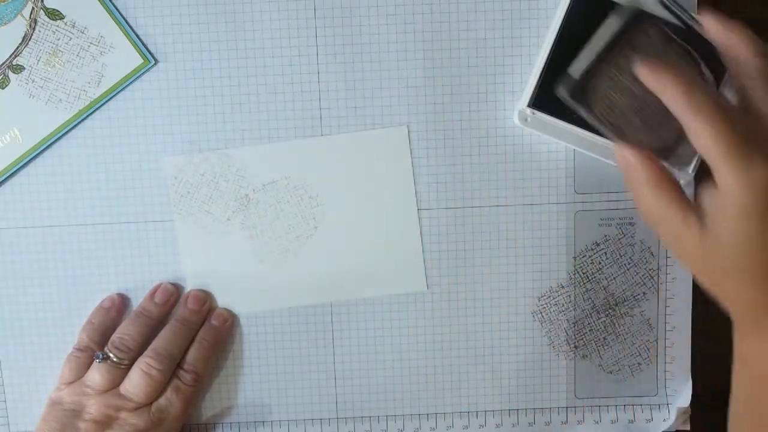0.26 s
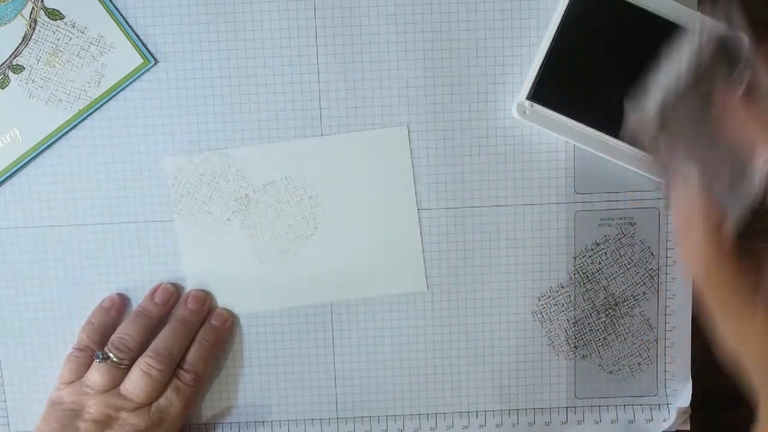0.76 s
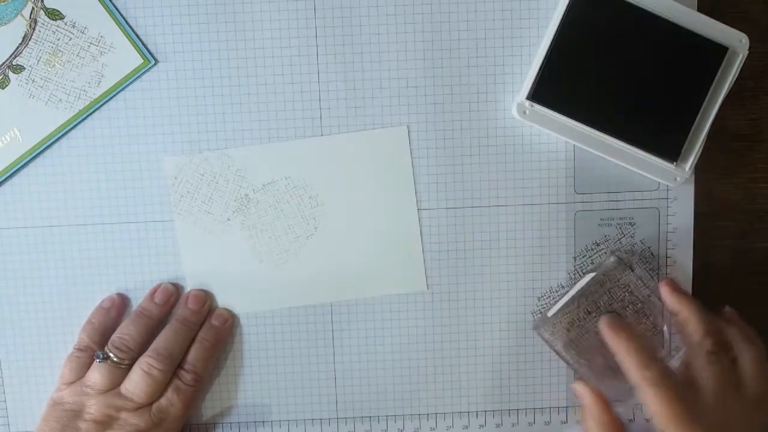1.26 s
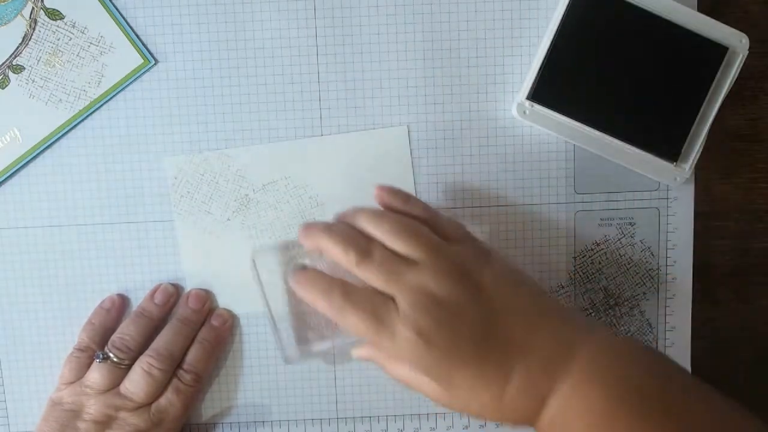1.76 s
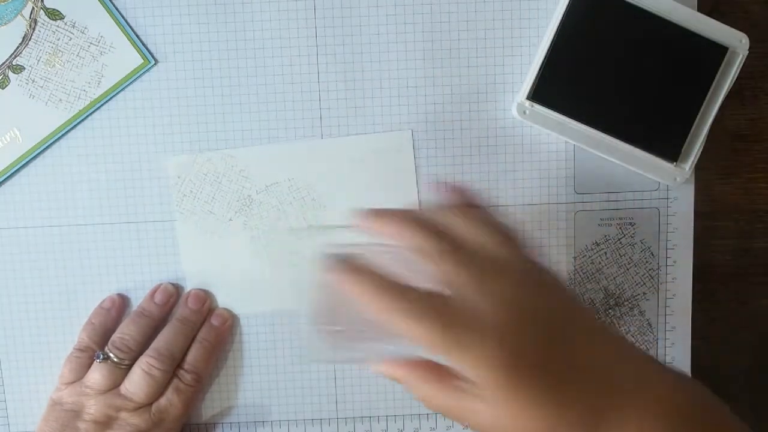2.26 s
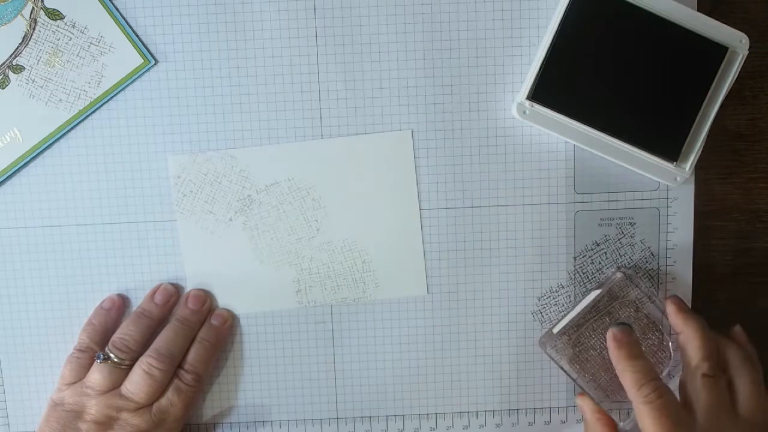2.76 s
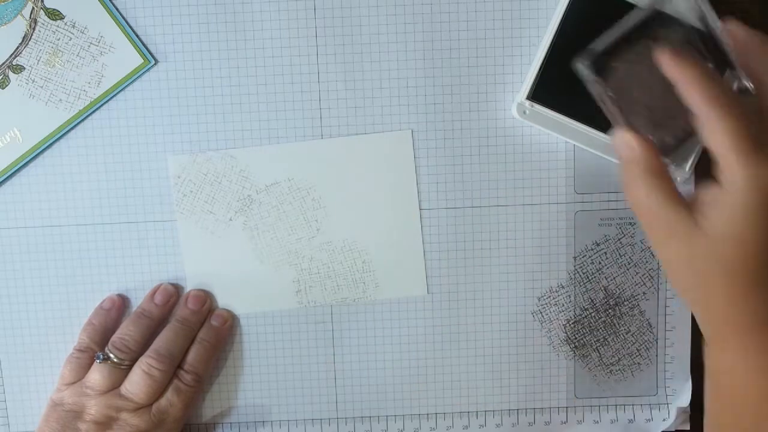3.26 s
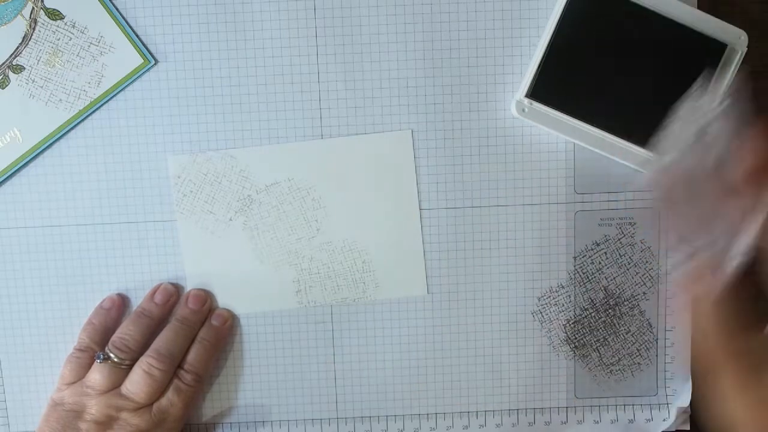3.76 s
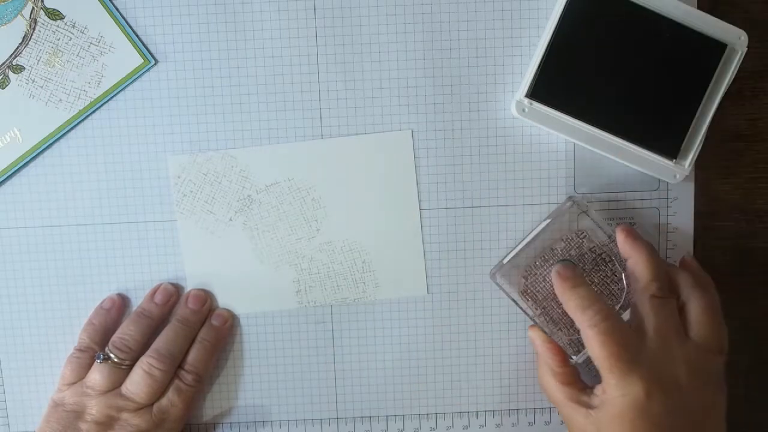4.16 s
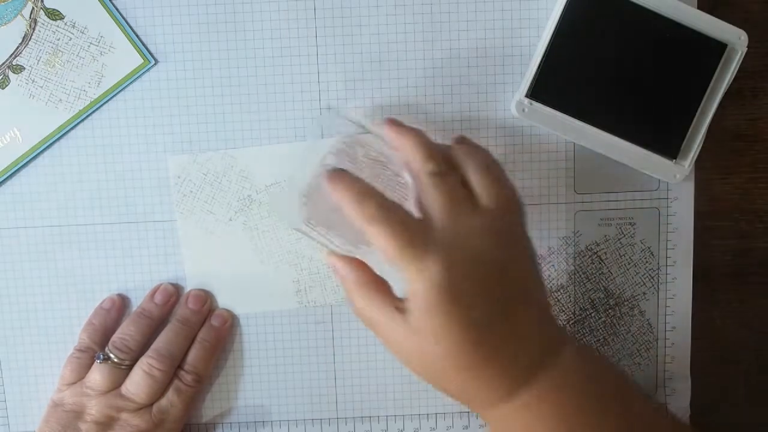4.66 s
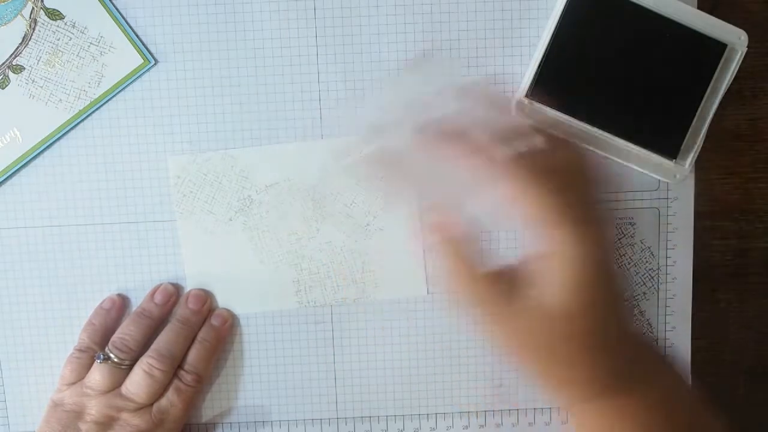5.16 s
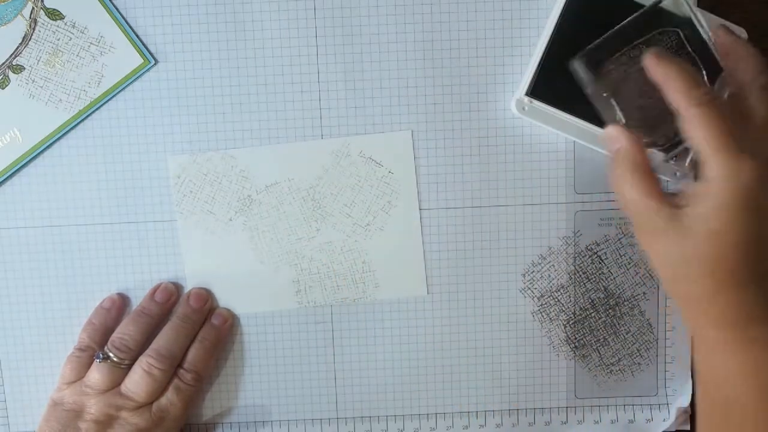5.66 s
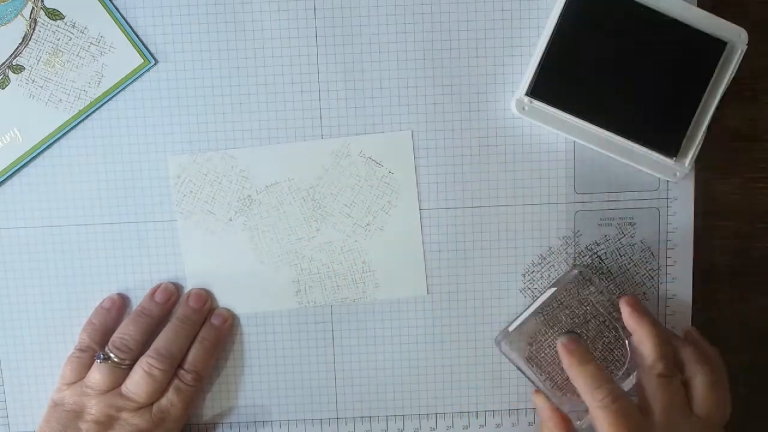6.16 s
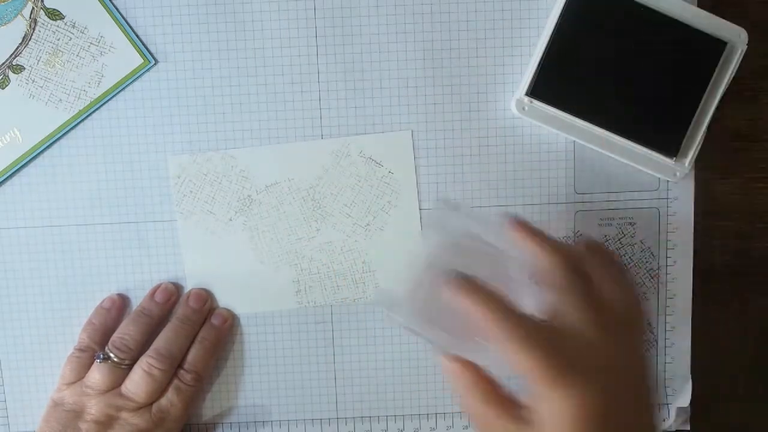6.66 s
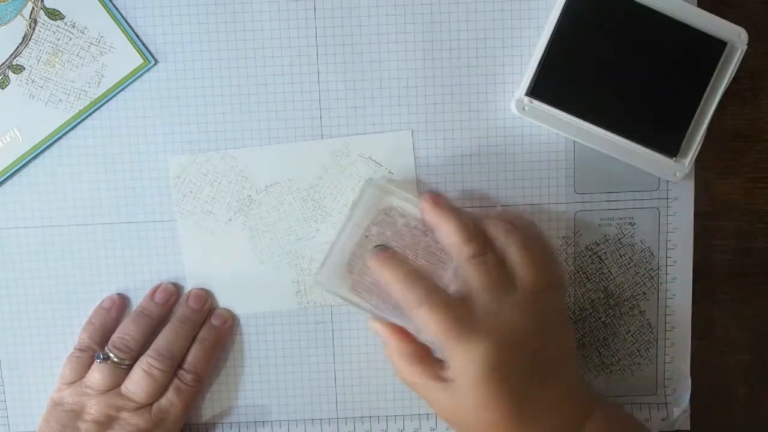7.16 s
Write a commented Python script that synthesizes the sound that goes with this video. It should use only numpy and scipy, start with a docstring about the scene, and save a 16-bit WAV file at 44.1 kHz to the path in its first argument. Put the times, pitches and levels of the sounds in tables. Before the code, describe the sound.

Over a soft, low room hush, a plastic stamp block is inked and pressed again and again. Dull pad bumps with slight hollow case rattle alternate with firm woody thumps topped by dry plastic clacks. Brief crackly peels release the tacky rubber. A hand lightly brushes paper, something loose rocks dully, and a short near-wall slap follows the close knocks.

```python
"""First the hush of a small room, then a bump on an ink pad, close to a pair of microphones at a craft table.
A clear acrylic stamp block lands on the pad, on scrap paper and on a card: damped modes thump the table top,
struck resonances clack the block or the pad's plastic case, and the tacky stamp peels off as a burst of snaps.
Something loose rocks with a dull double clack and a hand brushes the paper as swelling, grainy noise.
A slap from the near wall and a short diffuse echo place it all in the room."""
import sys
import numpy as np
from scipy import signal
from scipy.fft import rfft, irfft, next_fast_len
from scipy.io import wavfile

SR = 44100
rng = np.random.default_rng(int(sys.argv[2]) if len(sys.argv) > 2 else 0)


def persist_wave(psi):
    """Save psi, clipped to +-1, as 16-bit WAV."""
    counts = np.round(np.clip(psi, -1, 1) * 32767).astype(np.int16)
    wavfile.write(sys.argv[1], SR, np.atleast_2d(counts).T)


N = 327222
HIT_SIZE = SR // 2  # samples in half a second, the longest ring or echo

# Levels are relative within each table unless a reference is given.
# room hush, spectral density: pitch_hz, level_db (per Hz)
HUSH_COLOUR = [(15, -37), (25, -8), (53, 5.5), (70, -1.5), (152, 0), (316, -9.5), (403, -9), (637, -11),
               (749, -5.5), (812, -9.5), (1040, -9.5), (1150, -18), (1870, -11.5), (4950, -21.5),
               (15800, -29)]
# decay of the room's echo: pitch_hz, t60_s, level_db
ROOM_ECHO = [(149, 0.23, -11), (434, 0.17, -11), (925, 0.19, -9), (1800, 0.17, -11.5), (3500, 0.16, -11.5),
             (6640, 0.065, -13.5), (8500, 0.21, -6), (11300, .17, -13), (15100, 0.04, -11)]
# diffuse sound at the two microphones: pitch_hz, likeness (correlation, 0 to 1)
MIC_LIKENESS = [(100, 0.8), (500, 0.31), (1500, 0.23), (4000, 0.023), (8000, 0), (15000, 0.27)]
# hand and sleeve brush over the paper: middle_s, level_db (rms at full swell), half_length_s (to 1/e)
BRUSH_STROKES = [(1.604, -63.5, 0.16), (1.79, -57.5, 0.059), (4.53, -64.5, 0.08)]
# brush spectral density: pitch_hz, level_db (per Hz)
BRUSH_COLOUR = [(100, -25), (1500, -9), (4000, -2.5), (6800, -18), (8800, -4), (11000, -17), (16000, -9)]
# something loose rocks as the pressure changes: main_clack_s, level_db
LOOSE_ROCKS = [(1.23, -28.5), (1.82, -48), (6.365, -22)]
# resonances of the loose thing: pitch_hz, width_hz, level_db
LOOSE_RESONANCES = [(603, 310, -2), (750, 146, 3.5), (920, 164, 0.5), (1614, 96, 6.5), (1980, 117, 2),
                    (2550, 270, -6), (3450, 550, -9.5)]
# table top modes, its slow sway first: pitch_hz, level_db, t60_s (before the hand's damping)
TABLE_MODES = [(50, -15, 0.3), (88, -13, 0.292), (102, -5, 0.114), (119, -7, 0.193), (145, -19, 0.296),
               (161, 0, 0.066), (194, -9, 0.17), (232, -11.5, 0.16), (300, -14.5, 0.12), (343, -12, 0.223),
               (330, 1, 0.024), (421, -21, 0.118), (487, -9, 0.105), (572, -21, 0.164), (709, -17, 0.109),
               (866, -19, 0.122)]
# block lands on the ink pad, or the lifted pad drops back: start_s, thump_db, contact_hz (bandwidth), sway_db,
# knock_lag_s (negative = before the thump), knock_db, tick_db, touch_db (first touch, lighter or louder)
PAD_BUMPS = [(0.2139, -13.5, 128, 2, 0.0236, -25.5, -38, -41),
             (0.5202, -25.5, 91, 6.5, -0.013, -43.5, -53, -55),
             (3.2046, -12.5, 120, 3.5, 0.0092, -34.5, -49, -44.5),
             (5.3212, -10, 115, 3, 0.0215, -44, -47.5, -37)]
# resonances of the pad's plastic case: pitch_hz, width_hz, level_db
CASE_RESONANCES = [(400, 69, -2.5), (655, 66, -1.5), (835, 76, 3.5), (1143, 61, -2), (1554, 155, 2),
                   (1720, 274, 1.5), (1910, 610, -4), (2565, 200, -4.5), (3650, 520, -9)]
# stamp peels off: snap_s, level_db, fade_s (die-away scale), treble_db (lift of the treble)
PEELS = [(0.492, -47, 0.0032, 16), (0.504, -45.5, 0.0037, 5), (1.16, -38, .005, -11),
         (2.069, -37, 0.003, -1.5), (2.756, -34.5, 0.014, 4.5), (3.418, -40.5, 0.03, 5.5),
         (4.110, -36.5, 0.012, -2.5), (4.950, -30, 0.0043, 2), (5.547, -44.5, 0.022, 17),
         (6.305, -33, 0.0086, 0), (7.069, -33.5, 0.01, 10.5)]
# peel spectral density before the treble lift: pitch_hz, level_db (per Hz)
PEEL_COLOUR = [(200, -9), (700, -5), (1100, -5.5), (1550, 1), (1850, -1), (2600, 4.5), (4800, 0.5),
               (7000, -6.5), (8800, -1.5), (11000, -6.5), (13500, -12.5), (16000, -15)]
# block lands on paper: first_touch_s, thump_db, contact_hz (bandwidth), sway_db (of the whole table),
# clack_db, body_db (hollow body), tip_s (from a corner onto the edge; 0 = lands square)
STAMPINGS = [(0.9208, -13, 280, 0.5, -27, -28, 0.006), (1.7315, -12.5, 95, -2, -34, -36, 0.007),
             (2.4891, -17, 900, 5, -20, -17, 0), (3.8627, -15.5, 520.5, 2.5, -28, -22.5, 0.00051),
             (4.6439, -13.5, 230, 5.5, -28, -24, 0.0023), (6.017, -20, 155, -11, -45.5, -39, 0.0103),
             (6.736, -10, 205, -1, -23.5, -23.5, 0.00044), (7.3914, -12.5, 228, 0, -27.5, -21, 0.0016)]
# resonances of the block's hollow body: pitch_hz, width_hz, level_db
BODY_RESONANCES = [(520, 92, 1.5), (690, 250, -3.5), (895, 225, -2)]
# resonances of the block's clack: pitch_hz, width_hz, level_db
CLACK_RESONANCES = [(1200, 360, -13), (1663, 260, 13), (1956, 210, 12), (2580, 1030, 9), (3700, 250, -41),
                    (3800, 1000, -10), (5450, 2100, -10)]
# resonances of the bright tick of hard contacts: pitch_hz, width_hz, level_db
TICK_RESONANCES = [(5600, 170, 15), (8550, 5100, 9.3), (11460, 4500, 3.1)]

HUSH_DB = -56.64  # rms against full scale
CUTOFF_HZ = 15900  # top of the recorded band
ROCK_LEAD_S, ROCK_LEAD_DB = 0.009, -7  # the lighter first clack of each pair
WEIGHT_LAG_S = 0.00244  # the weight bears on the table just after the first touch
SECOND_S, SECOND_DB = 0.006987, 0.9  # each low thump comes twice: delay and strength of the second thump
HAND_DAMPING = 1.16  # the pressing hand speeds up the table's decay by this factor
SQUEEZE_CYCLES = 0.23  # the rubber takes up the load over this share of a period of the contact bandwidth
JOLT_DB, JOLT_HZ = -7, 176  # table jolt from a sudden peel: level against the peel, contact bandwidth
SUDDEN_S = 0.004  # die-away at which the jolt has that level; slower peels jolt less
TOUCH_LEAD_S, TOUCH_TICK_DB = 0.011, -15  # first touch: lead on the knock, its tick against its own level
RATTLE_GAP_S = 0.022  # mean spacing as the case settles
RATTLE_DB, RATTLE_LOSS_DB = -37.5, 4.5  # first bounce against the thump, loss per bounce
BUILD_S, BUILD_SHARE = 0.0098, 0.76  # least build-up of the pull; in a slow peel, share of its die-away
CORNER_DB = -16.5  # a corner's touch against the clack that follows


def from_db(db):
    """Decibels to gain."""
    return 10 ** (np.asarray(db) / 20)


def unit(x):
    """Scale to energy 1."""
    return x / np.sqrt(np.sum(x ** 2) + 1e-20)


def at_hz(points, hz, axis=1):
    """Read one column of a table on a log-frequency axis."""
    points = np.array(points)
    return np.interp(np.log(np.maximum(hz, 1)), np.log(points[:, 0]), points[:, axis])


def cut(x, hz, kind, order=2):
    """Butterworth low- or high-pass."""
    return signal.sosfilt(signal.butter(order, min(hz, SR / 2 - 10), kind, fs=SR, output="sos"), x)


def colour(x, spectrum):
    """Give a noise a spectrum."""
    size = x.shape[-1]
    return irfft(rfft(x) * from_db(at_hz(spectrum, np.fft.rfftfreq(size, 1 / SR))), size)


def add(track, s, sound):
    """Mix a sound into a track at a time."""
    start = max(int(s * SR), 0)
    track[start:start + len(sound)] += sound[:max(N - start, 0)]


def delay(x, s):
    """Delay by any fraction of a sample."""
    size = next_fast_len(N + HIT_SIZE)
    turn = np.exp(-2j * np.pi * s * np.fft.rfftfreq(size, 1 / SR))
    return irfft(rfft(x, size) * turn, size)[:N]


def diffuse_noise(size):
    """White stereo noise, most alike at the two microphones in the bass."""
    mid, side = rfft(rng.standard_normal((2, size)))
    alike = np.clip(at_hz(MIC_LIKENESS, np.fft.rfftfreq(size, 1 / SR)), 0, 1)
    return irfft(np.sqrt(1 + alike) * mid + np.sqrt(1 - alike) * side * [[1], [-1]], size)


def strike(resonances, chatter_s, chatter):
    """A click and a brief chatter of small contacts ring the resonances, differently on each blow; energy 1."""
    t = np.arange(HIT_SIZE // 4) / SR
    fade = np.exp(-t / chatter_s)
    force = chatter * unit(rng.standard_normal(len(t)) * fade)
    force[0] += 1
    # sharp contacts feed all pitches evenly
    spread = rfft(force)
    force = irfft(spread / (np.abs(spread) + 1e-9), len(t)) * np.sqrt(fade)
    out = 0
    for k, (hz, width, db) in enumerate(resonances):
        r = np.exp(-np.pi * width / SR)
        gain = (-1) ** k * (1 - r * r) * from_db(db + rng.standard_normal())
        poles = [1, -2 * r * np.cos(2 * np.pi * hz / SR), r * r]
        out = out + gain * signal.lfilter([1, 0, -1], poles, force + 1e-18)
    return unit(out)


def room_hush():
    """Steady diffuse noise, strongest in the bass, lies under everything."""
    return from_db(HUSH_DB) * np.sqrt(2 * N) * unit(colour(diffuse_noise(N), HUSH_COLOUR))


def room_echo(x):
    """Diffuse echoes build up and die away, octave by octave."""
    t, echo = np.arange(HIT_SIZE) / SR, 0
    bins = np.fft.rfftfreq(HIT_SIZE, 1 / SR)
    noise = rfft(diffuse_noise(HIT_SIZE)) * from_db(at_hz(ROOM_ECHO, bins, axis=2))
    build_up = 1 - np.exp(-(t / .005) ** 2)
    for hz in 125 * 2 ** np.arange(8):
        octave = np.clip(1 - np.abs(np.log2(np.maximum(bins, 1) / hz)), 0, 1)
        decay = np.exp(-np.log(1000) * t / at_hz(ROOM_ECHO, hz))
        echo = echo + irfft(noise * octave, HIT_SIZE) * unit(build_up * decay)
    return signal.fftconvolve(x[None], echo, axes=1)[:, :N]


def wall_slap(clack, wall_s=.0084, wall_hz=3500):
    """The near wall returns the block's clack once, late and dulled."""
    return cut(delay(from_db(-5.5) * clack, wall_s), wall_hz, "low")


def hand_brush(grain_db=3):
    """A soft, grainy hiss swells and fades with each stroke of the hand."""
    t = np.arange(N) / SR
    swell = sum(from_db(db) * np.exp(-((t - s) / half_s) ** 2) for s, db, half_s in BRUSH_STROKES)
    grains = rng.standard_normal(N) * from_db(grain_db * rng.standard_normal(N))
    return swell * np.sqrt(N) * unit(colour(grains, BRUSH_COLOUR))


def loose_rocks(level_db=22.5, top_hz=3700, bottom_hz=420):
    """A dull, grainy double clack with no weight behind it."""
    out = np.zeros(N)
    for main_s, main_db in LOOSE_ROCKS:
        for s, db in (main_s - ROCK_LEAD_S, main_db + ROCK_LEAD_DB), (main_s, main_db):
            clack = strike(LOOSE_RESONANCES, chatter_s=0.0073, chatter=1.6)
            dull = cut(cut(clack, top_hz, "low", order=6), bottom_hz, "high")
            add(out, s, from_db(db + level_db) * dull)
    return out


def table_loads():
    """Every push on the table, from landings and peels: start_s, thump_db, contact_hz, sway_db."""
    stampings = [(s + WEIGHT_LAG_S, db, hz, sway) for s, db, hz, sway, *_ in STAMPINGS]
    jolts = []
    for s, db, fade_s, _ in PEELS:
        suddenness_db = 2 * 20 * np.log10(SUDDEN_S / fade_s)
        jolts.append((s, db + JOLT_DB + suddenness_db, JOLT_HZ, 0))
    return stampings + [bump[:4] for bump in PAD_BUMPS] + jolts


def table_thumps(lowest_hz=33, spread_db=1.7):
    """The table's modes ring under each load; a cushioned contact reaches only the low ones."""
    out, t = np.zeros(N), np.arange(HIT_SIZE) / SR
    for s, db, contact_hz, sway_db in table_loads():
        modes = []
        for hz, level, t60 in TABLE_MODES:
            decay = np.exp(-np.log(1000) * HAND_DAMPING * t / t60)
            gain = from_db(level + spread_db * rng.standard_normal())
            modes.append(gain * decay * np.cos(2 * np.pi * hz * t))
        ring = sum(modes[1:]) - from_db(sway_db) * modes[0]  # the slow sway starts opposite to the other modes
        squeeze = 1 - np.exp(-t * contact_hz / SQUEEZE_CYCLES)
        cushioned = cut(ring, contact_hz, "low") * squeeze
        thump = -from_db(db) * cut(cushioned, lowest_hz, "high", order=4)
        add(out, s, thump)
        add(out, s + SECOND_S, from_db(SECOND_DB) * thump)
    return out


def case_contacts(count=3, bounce_tick_db=-20):
    """Each bump is a first touch, the knock and a dying run of bounces: start_s, knock_db, tick_db."""
    contacts = []
    for start, thump_db, _, _, lag_s, knock_db, tick_db, touch_db in PAD_BUMPS:
        s = start + lag_s
        contacts.append((s - TOUCH_LEAD_S, touch_db, touch_db + TOUCH_TICK_DB))
        contacts.append((s, knock_db, tick_db))
        for k in range(count):
            s += RATTLE_GAP_S * rng.uniform(.8, 1.2)
            db = thump_db + RATTLE_DB - k * RATTLE_LOSS_DB
            contacts.append((s, db, db + bounce_tick_db))
    return contacts


def case_knocks(knock_db=30, tick_db=22):
    """The hollow plastic case of the ink pad knocks under the block and rattles on the table."""
    out = np.zeros(N)
    for s, knock, tick in case_contacts():
        hollow = strike(CASE_RESONANCES, chatter_s=.0035, chatter=2.2)
        add(out, s, from_db(knock + knock_db) * cut(hollow, 2580, "low"))
        add(out, s, from_db(tick + tick_db) * strike(TICK_RESONANCES, chatter_s=.005, chatter=2.2))
    return out


def stamp_peels(level_db=28, snaps_per_s=9000, treble_hz=5500):
    """Threads of ink snap ever faster until the stamp lets go, then the snaps thin out."""
    out, t = np.zeros(N), np.arange(-HIT_SIZE // 8, HIT_SIZE // 8) / SR
    for s, db, fade_s, treble_db in PEELS:
        build_s = max(BUILD_S, BUILD_SHARE * fade_s)
        pull = np.exp(-np.abs(t / np.where(t < 0, build_s, fade_s)) ** 1.6)
        snapped = rng.random(len(t)) < snaps_per_s * np.sqrt(pull) / SR
        sizes = from_db(3 * np.minimum(rng.exponential(1, len(t)), 4))
        signs = rng.choice([-1, 1], len(t))
        crackle = colour(snapped * sizes * signs * pull, PEEL_COLOUR)
        crackle = crackle + (from_db(treble_db) - 1) * cut(crackle, treble_hz, "high", order=1)
        add(out, s + t[0], from_db(db + level_db) * unit(crackle))
    return out


def block_clacks(body_gain_db=21, clack_gain_db=24.0, tick_gain_db=12.5):
    """Hard acrylic meets the paper-covered table: a hollow body and a clack, and apart from them a bright tick."""
    clacks, ticks = np.zeros((2, N))
    for start, _, _, _, clack_db, body_db, tip_s in STAMPINGS:
        contacts = [(start + tip_s, 0)]
        if tip_s > WEIGHT_LAG_S:  # slow tipping: the corner is heard apart
            contacts.append((start, CORNER_DB))
        for s, db in contacts:
            body = strike(BODY_RESONANCES, chatter_s=0.01, chatter=1.0)
            clack = strike(CLACK_RESONANCES, chatter_s=.003, chatter=2.2)
            tick = cut(strike(TICK_RESONANCES, chatter_s=.0035, chatter=2.5), 4000, "high")
            add(clacks, s, from_db(db + body_db + body_gain_db) * body)
            add(clacks, s, from_db(db + clack_db + clack_gain_db) * clack)
            add(ticks, s, from_db(db + clack_db + tick_gain_db) * tick)
    return clacks, ticks


def scene(mic_lag_s=2.5e-5, pan_db=0.5):
    """All sounds at a close pair of microphones, with the wall slap, the room's echo and its hush."""
    rock, thump, case = loose_rocks(), table_thumps(), case_knocks()
    peel = stamp_peels() + hand_brush()
    clack, tick = block_clacks()
    pan = from_db([[-pan_db], [pan_db]])
    near = thump + tick + peel + wall_slap(clack) + (clack + case + rock) * pan
    direct = np.array([delay(near[0], mic_lag_s), near[1]])  # the right microphone is slightly nearer
    echoes = room_echo(from_db(-6.5) * thump + from_db(1.0) * clack + from_db(-2.5) * tick
                       + from_db(-2.0) * case + from_db(4.5) * rock + peel)
    return direct + echoes + room_hush()


def record(dry):
    """Peaks clip at full scale, then a steep low-pass cuts the top."""
    low_pass = signal.ellip(10, .1, 80, CUTOFF_HZ, fs=SR, output="sos")
    return signal.sosfilt(low_pass, np.clip(dry, -1, 1))


dry = scene()
out = record(dry)
persist_wave(out)
```